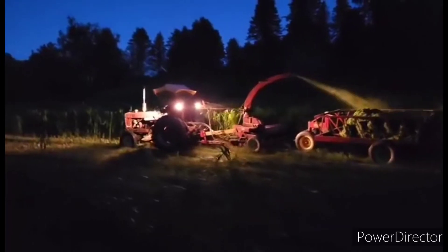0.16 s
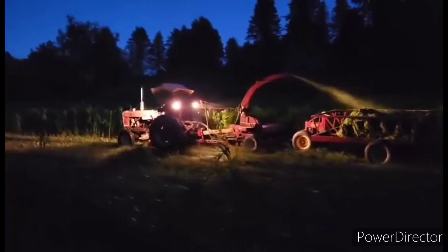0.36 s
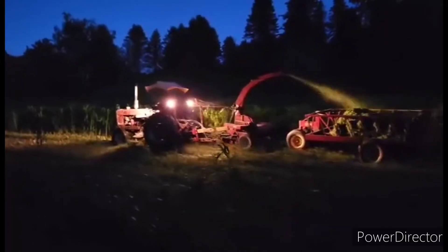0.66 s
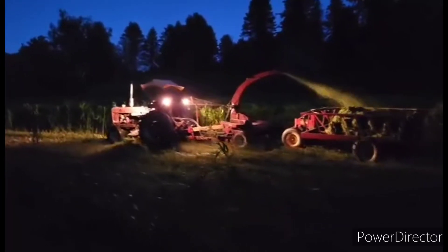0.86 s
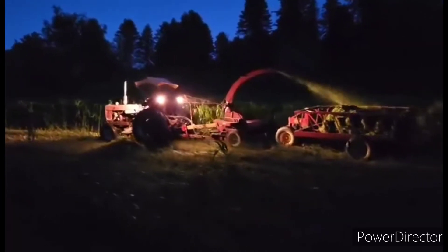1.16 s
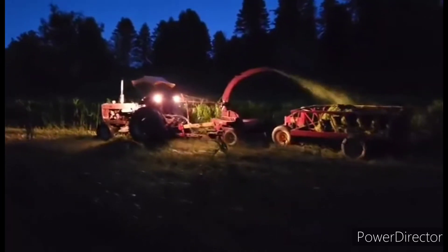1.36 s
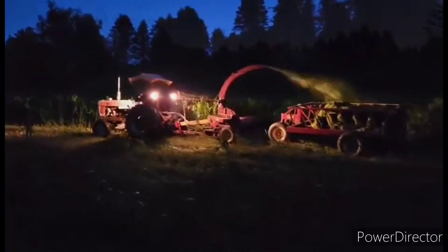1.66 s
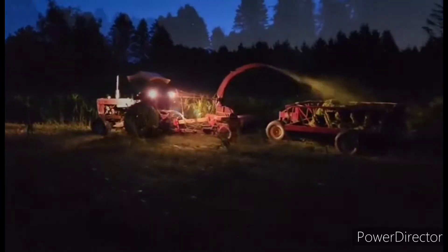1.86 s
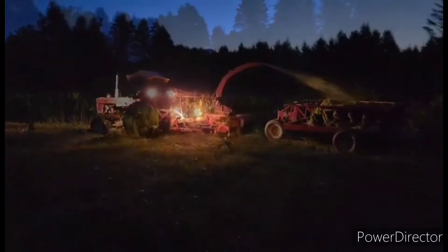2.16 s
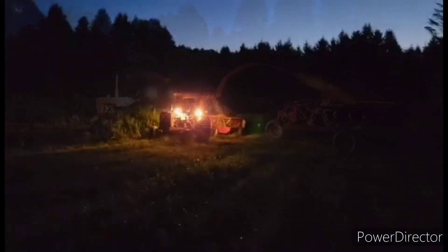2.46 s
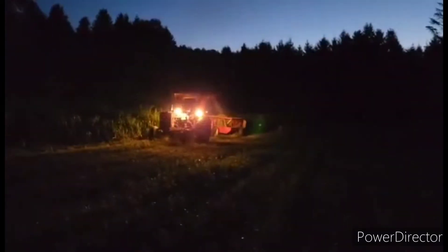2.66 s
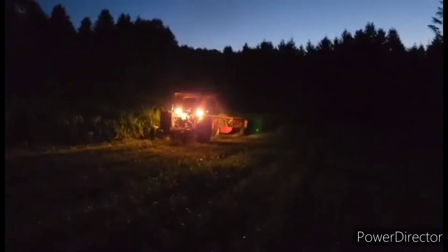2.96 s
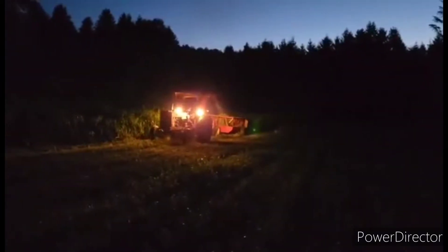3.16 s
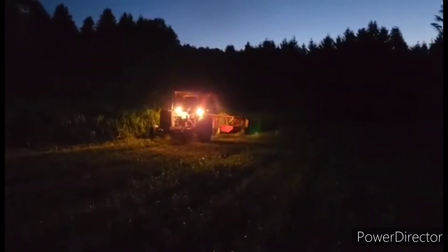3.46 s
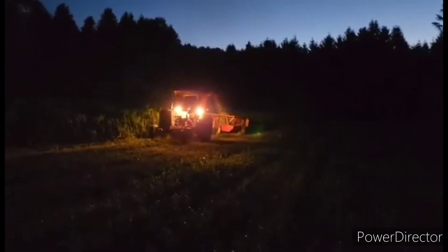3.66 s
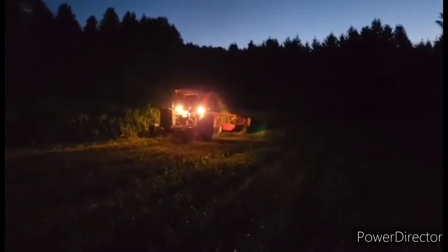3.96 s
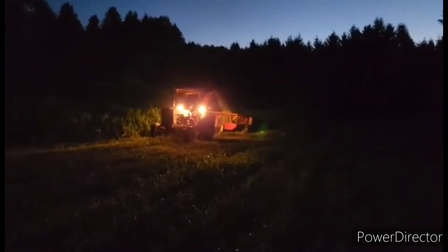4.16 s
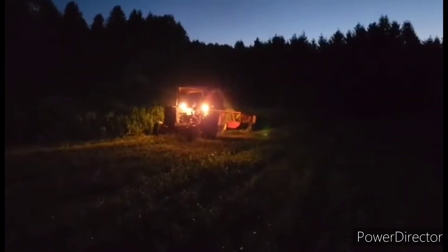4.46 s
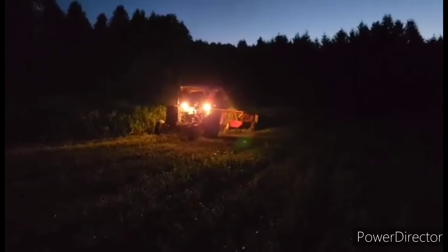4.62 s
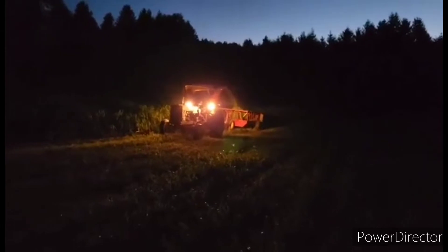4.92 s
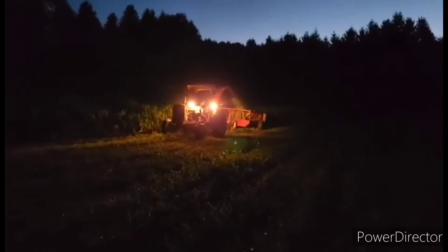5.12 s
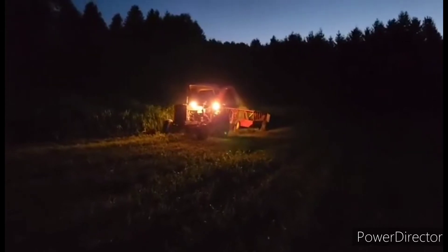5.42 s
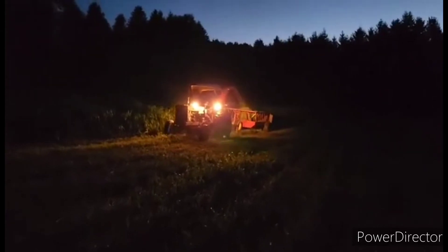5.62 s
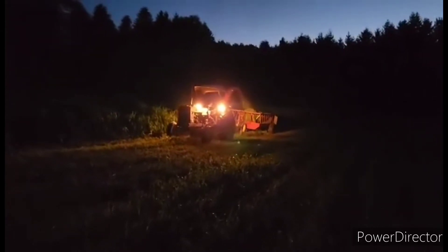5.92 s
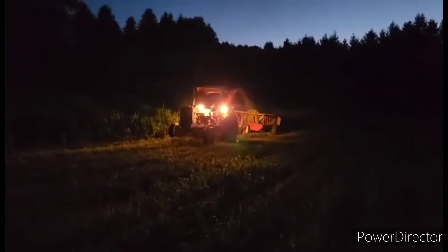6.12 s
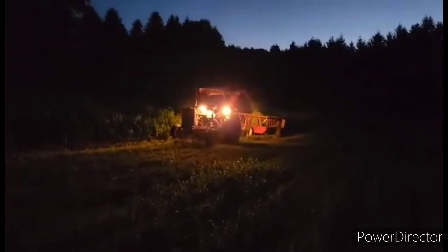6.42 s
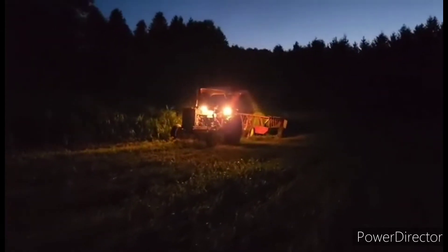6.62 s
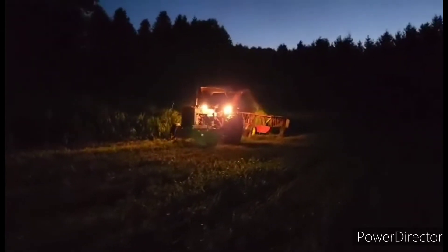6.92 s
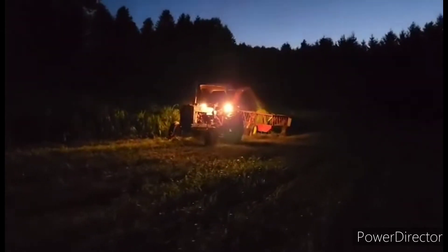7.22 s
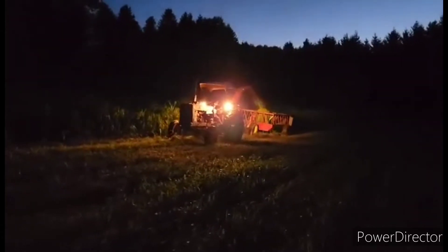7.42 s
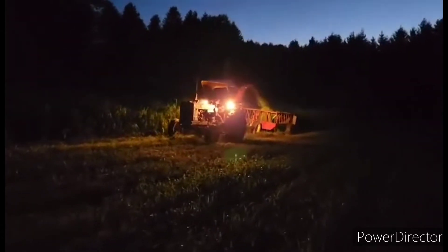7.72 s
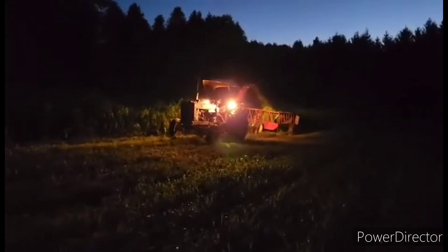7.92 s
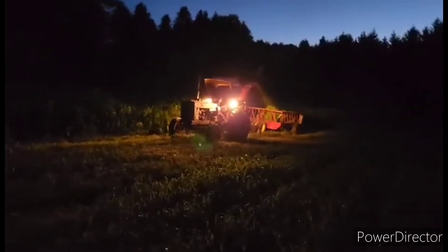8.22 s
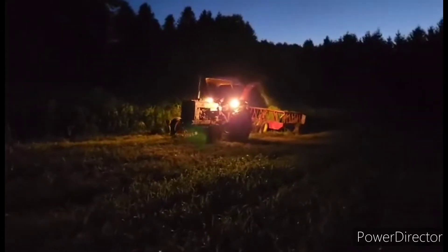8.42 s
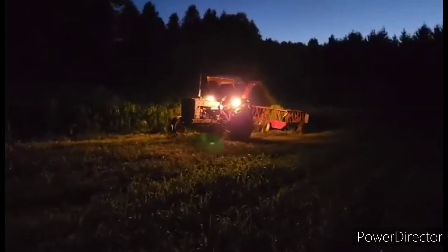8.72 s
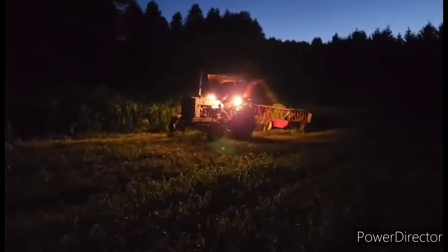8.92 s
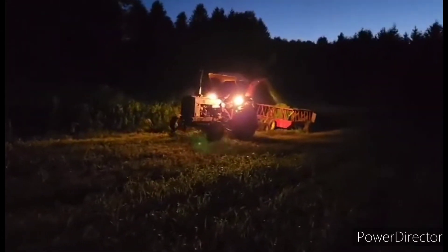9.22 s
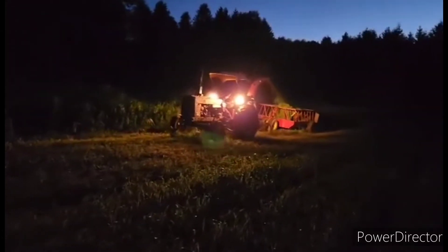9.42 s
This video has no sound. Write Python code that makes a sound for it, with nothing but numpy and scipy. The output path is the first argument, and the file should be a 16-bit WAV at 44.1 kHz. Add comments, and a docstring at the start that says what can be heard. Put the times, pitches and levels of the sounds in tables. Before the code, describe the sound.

Dense, unbroken machine roar outdoors: a strong low engine note, wavering gear whine, diesel knock and the hiss of chopped grass blown through a spout. Heard first from the side, leaning left in the treble; a tiny gap just after two seconds, then from the front with crisp spray and sparse stalk ticks. Near five seconds the top fades, leaving a darker steady roar to the end. Stereo pickup, no obvious echo.

```python
"""Tractor and flail chopper in tall grass

A six-cylinder tractor drives a flail chopper that cuts grass and blows it up a spout into a wagon.
Exhaust, flail rotor and blower drone as harmonics at geared speeds; shaped noise makes the rushing air
and diesel knock, and short decaying sines make the clatter and ticking stalks. Two microphone ports hear it
from the side, then, after a short silence, from ahead, where the tone soon changes and the bright spray fades."""
import sys
import numpy as np
from scipy import signal
from scipy.fft import rfft, irfft, next_fast_len
from scipy.io import wavfile
from scipy.ndimage import uniform_filter1d, map_coordinates

SR = 44100
rng = np.random.default_rng(int(sys.argv[2]) if len(sys.argv) > 2 else 0)


def to_wav(s):
    """Save 16-bit WAV."""
    ch = np.atleast_2d(s).T  # columns
    pcm = np.round(np.clip(ch, -1, 1) * 32767)  # PCM
    wavfile.write(sys.argv[1], SR, pcm.astype(np.int16))


N = 422478
TIME = np.arange(N) / SR
SIZE = next_fast_len(N + 8192, True)  # padded so that filter tails do not wrap round
HZ = np.fft.rfftfreq(SIZE, 1 / SR)
TOP_HZ = 13150  # upper band limit
SIDE_END, AHEAD_START = 2.137, 2.207  # s, silence between the two positions


def amp(db):
    """Decibels to gain."""
    return 10 ** (np.asarray(db) / 20)


def unit(x):
    """Scale to rms 1."""
    return x / np.sqrt(np.mean(x ** 2) + 1e-20)


def curve(rows):
    """(t/s, value) rows as one value per sample."""
    return np.interp(TIME, *np.transpose(rows))


def wobble(rate):
    """A smooth random curve, rate knots a second."""
    coarse = np.arange(0, TIME[-1] + .01, .002)
    knots = rng.standard_normal(2048)
    smooth = map_coordinates(knots, [coarse * rate], mode="wrap")
    return np.interp(TIME, coarse, smooth)


def filtered(x, response):
    """x times a response given on the HZ grid."""
    return irfft(rfft(x, SIZE) * response, SIZE)[..., :N]


def columns(rows):
    """Each column of a frequency table on the HZ grid, interpolated over log frequency."""
    hz, *cols = np.transpose(rows)
    return [np.interp(np.log(HZ + 1), np.log(hz), col) for col in cols]


# Firing rate of the governed engine, a little lower under load: [t/s, f/Hz]
FIRING = [(0.5, 111.98), (1.45, 111.66), (2.45, 113.65), (3.35, 113.68), (6.05, 113.3), (9.5, 113.35)]


def engine_firings():
    """Firings since the start, the integral of the firing rate: the clock of engine and driven shafts."""
    return np.cumsum(curve(FIRING)) / SR


# From ahead, crossfade from the first tone colour to the second: [t/s, share of the second 0-1]
TO_SECOND = [(4.66, 0), (4.73, .2), (4.8, .85), (4.92, 1)]


def drone(turns, table, flutter_db, slip, slip_rate):
    """Harmonics of one shaft waver in level; its slip (in turns) smears the high ones most."""
    out = np.zeros(N)
    stray = slip * wobble(slip_rate)
    second_share = curve(TO_SECOND)
    for multiple, side_db, *front_db in table:
        # a single front level serves both tone colours
        front = front_db[0] * (1 - second_share) + front_db[-1] * second_share
        level_db = np.where(TIME < AHEAD_START, side_db, front) + flutter_db * wobble(11)
        phase = round(multiple) * (turns + stray) + rng.random()
        out += np.sqrt(2) * amp(level_db) * np.sin(2 * np.pi * phase)
    return out


# Exhaust harmonics, before LOAD: [multiple of the engine cycle, side level/dB, first front level/dB,
# second front level/dB where it differs]
EXHAUST = [(2, -52, -48), (4, -47, -39), (5, -42, -50), (6, -17.8, -14.2), (12, -47, -35), (13, -50, -41.5),
           (14, -50, -43.5), (15, -52, -45), (19, -53, -51), (24, -53, -56, -50), (29, -56, -52, -45),
           (32, -46, -46), (35, -48, -44), (36, -40, -41), (37, -46, -45), (38, -44, -47), (39, -47, -44),
           (41, -52, -44), (42, -54, -45)]
# Gain of the exhaust note: [t/s, level/dB]
LOAD = [(.5, 2), (1.6, -0.5), (2.4, 0), (3.4, 1), (4.6, 0.3), (5.8, -0.5), (7.2, -0.1), (9.4, 0.8)]


def exhaust_note(cycle):
    """Six firings in each engine cycle make harmonics of the cycle, strongest at the firing rate."""
    return amp(curve(LOAD)) * drone(cycle, EXHAUST, flutter_db=.3, slip=.001, slip_rate=14)


# Flail rotor harmonics: [multiple of rotor speed, side level/dB, front level/dB]
FLAILS = [(1, -51, -51), (3, -34, -38), (4, -30.5, -31.5), (5, -33, -35), (6, -46, -40), (7, -45, -41),
          (8, -48, -42), (10, -48, -43)]


def flail_rotor(firings):
    """The geared rotor makes .233 turns for each firing and drones at multiples of its speed."""
    return drone(.233 * firings, FLAILS, flutter_db=0.2, slip=0.0049, slip_rate=5.7)


BLOWER_TURNS = .2432  # blower turns per firing
# Blower harmonics, before BLOWER_HUM: [multiple of blower speed, side level/dB, front level/dB]
BLOWER = [(2, -32, -43), (3, -41, -52), (4, -28, -38), (6, -34, -21.8), (10, -32.5, -46), (12, -36.5, -49),
          (14, -38.5, -55), (16, -47, -55), (18, -46, -52), (20, -54, -47)]
# Gain of the blower's hum as it swells and eases: [t/s, level/dB]
BLOWER_HUM = [(2.14, 0), (2.4, 2), (3.1, -.5), (4.1, -2), (5.2, .7), (7.9, 1.3), (9.5, -1.7)]


def blower_hum(firings):
    """The blower wheel hums at multiples of its geared speed."""
    hum = drone(BLOWER_TURNS * firings, BLOWER, flutter_db=0.55, slip=0.0048, slip_rate=5)
    return amp(curve(BLOWER_HUM)) * hum


# Gearbox mesh rate: [t/s, f/Hz]
MESH = [(2.14, 343.3), (2.2, 340.9), (9.5, 339.8)]
# Gearbox whine, before WHINE: [multiple of mesh rate, side level/dB, first front level/dB,
# second front level/dB where it differs]
GEARS = [(1, -48, -50), (2, -42, -44), (3, -36.0, -34.3, -35.5)]
# Gain of the whine: [t/s, level/dB]
WHINE = [(0, 1), (.3, 2.5), (.65, -3), (1.65, 2), (2.3, -.5), (4.6, -.5), (6.1, 2.2), (7, -.5), (8.7, 0),
         (9.5, -2)]
# Upper gearbox overtones, before OVERTONE_WHINE: [multiple of mesh rate, side level/dB,
# first front level/dB, second front level/dB]
GEAR_OVERTONES = [(4, -39.5, -47, -45.5), (5, -56, -52, -47), (6, -52, -43.5, -39.8), (7, -58, -57, -45.5)]
# Driveline tones that ring with them, before OVERTONE_WHINE: [multiple of the engine cycle,
# side level/dB, first front level/dB, second front level/dB]
GEAR_TRAIN = [(99, -60, -56, -49.5), (100, -60, -58, -51), (110, -60, -56, -51.5)]
# Gain of the overtones and driveline tones: [t/s, level/dB]
OVERTONE_WHINE = [(2.3, 7), (3.9, 2), (5.0, 4), (5.7, 4), (6.4, 6.5), (7.3, 2), (8.3, -4), (9.2, 4)]


def gearbox_whine(cycle):
    """Meshing teeth whine at multiples of the mesh rate, with ringing driveline tones above."""
    mesh = np.cumsum(curve(MESH)) / SR
    whine = drone(mesh, GEARS, flutter_db=2.0, slip=.015, slip_rate=16)
    overtones = drone(mesh, GEAR_OVERTONES, flutter_db=2.4, slip=.012, slip_rate=12)
    overtones += drone(cycle, GEAR_TRAIN, flutter_db=3, slip=.001, slip_rate=10)
    return whine * amp(curve(WHINE)) + overtones * amp(curve(OVERTONE_WHINE))


# Oil pump: [multiple of pump speed, side level/dB, first front level/dB, second front level/dB]
PUMP = [(1, -40.5, -45.5, -47)]


def oil_pump(firings):
    """The oil pump, geared up to 3.078 turns a firing, adds one unsteady tone."""
    return drone(3.078 * firings, PUMP, flutter_db=2.5, slip=0.056, slip_rate=6)


# Cooling fan: [multiple of fan tone, side level/dB, first front level/dB,
# second front level/dB where it differs]
FAN = [(1, -60, -38), (2, -43, -44), (6, -60, -56, -46)]


def cooling_fan(firings):
    """The fan's tones keep step with the engine at 2.774 cycles a firing and stray about it."""
    return drone(2.774 * firings, FAN, flutter_db=2.5, slip=0.031, slip_rate=6)


def driveline(firings):
    """All the rotating parts together, in step with the firings except for the gear mesh."""
    cycle = firings / 6
    return (exhaust_note(cycle) + flail_rotor(firings) + blower_hum(firings)
            + gearbox_whine(cycle) + oil_pump(firings) + cooling_fan(firings))


def bursts(firings, cylinder_db, lag, rise, decay, scatter_db):
    """An envelope that swells and dies at each firing, sized by its cylinder; times are shares of a firing."""
    late = firings + len(cylinder_db) - lag
    number, age = late.astype(int), late % 1
    size_db = cylinder_db[number % len(cylinder_db)] + scatter_db * rng.standard_normal(2048)[number]
    swell = np.sin(np.pi / 2 * np.minimum(age / rise, 1))
    return unit(amp(size_db) * (.4 + .6 * swell) * np.exp(-age / decay))


# Relative strength of each cylinder in firing order: [knock level/dB, exhaust bark level/dB]
CYLINDERS = [(-2, -3), (0, 1), (0, 2), (3, 2), (-2, -5), (5.5, 2)]


def cylinder_pulses(firings):
    """Knock and bark envelopes: the uneven cylinders repeat their pattern every six firings."""
    knock_db, bark_db = np.transpose(CYLINDERS)
    knock = bursts(firings, knock_db, lag=.2, rise=.22, decay=.55, scatter_db=.9)
    bark = bursts(firings, bark_db, lag=.1, rise=.28, decay=.85, scatter_db=.5)
    return knock, bark


def gated_noise(envelope, share):
    """Noise for two channels; the given share of its power follows the envelope."""
    return rng.standard_normal((2, N)) * np.sqrt(1 - share + share * envelope ** 2)


# Thick and thin patches of grass, before air and spray scale them: [middle t/s, length/s, level/dB]
PATCHES = [(1.36, 0.22, 4.6), (2.05, 0.45, -0.5), (4.204, 0.1, 0.5), (6.25, .3, 0), (7.3, .6, -0.8),
           (8.0, .25, -0.5), (8.5, 0.54, 0), (9.298, .25, 0.5)]
FEED_UNEVEN_DB, FEED_RATE = -0.08, 3.1  # chance unevenness: depth in dB, knots a second


def crop_feed():
    """Crop feed in dB: each patch swells or dips smoothly over a slightly uneven flow."""
    feed_db = FEED_UNEVEN_DB * wobble(FEED_RATE)
    for middle, length, db in PATCHES:
        position = np.clip((TIME - middle) / length, -.5, .5)
        feed_db = feed_db + db * np.cos(np.pi * position) ** 2
    return feed_db


def stalks(per_second, spread_db, life, top_hz):
    """Chopped stalks tick against steel, each a decaying sine (life in s) with its own pitch."""
    when, pitch, size, phase = rng.random((int(per_second * N / SR), 4)).T[:, :, None]
    k = np.arange(256)
    ticks = np.sin(2 * np.pi * (pitch * top_hz * k / SR + phase)) * np.exp(-k / (life * SR))
    ticks *= amp(spread_db * np.minimum(-np.log(size), 4))
    places = (when * N).astype(int) + k
    return unit(np.bincount(places.ravel(), ticks.ravel(), N)[:N])


def crop_spray(knock, feed_db, knock_share, spray_db):
    """Grainy treble: partly knock-gated noise and dense stalk ticks, swelling with the crop."""
    ticks = np.array([stalks(per_second=1000, spread_db=3.0, life=.0014, top_hz=TOP_HZ)
                      for channel in range(2)])
    grains = .9 * gated_noise(knock, knock_share) + .46 * ticks
    return grains * amp(spray_db + 1.4 * feed_db)


# Tough stalks striking the spout: [t/s, level/dB, f/Hz]
HARD_STALKS = [(2.4016, -17, 6590), (3.122, -21, 6540), (4.4075, -13.5, 4960), (4.6729, -20, 4100),
               (5.8892, -21, 4310), (6.2603, -19, 4460), (7.7415, -22, 3580), (8.166, -21, 4020),
               (8.2713, -19, 4640)]
STALK_LIFE_S, STALK_CRACK = .0014, .28  # decay time, noise added to the sine


def hard_stalks():
    """Now and then a tough stalk hits the spout with one short, bright tick."""
    out = np.zeros(N)
    t = np.arange(SR // 100) / SR
    for start, db, hz in HARD_STALKS:
        tick = np.sin(2 * np.pi * hz * t) + STALK_CRACK * rng.standard_normal(len(t))
        out[round(start * SR):][:len(t)] += amp(db) * tick * np.exp(-t / STALK_LIFE_S)
    return out


# Gain of the air stream: [t/s, level/dB]
AIR_FLOW = [(.3, 0.5), (.7, 0), (1.3, -0.9), (1.9, -0.7), (2.25, -1), (4.3, -1.2), (4.9, -1.5), (5.5, -1.5),
            (6.3, -0.9), (7.0, -1.5), (9.5, -2)]


def air_stream(firings, knock, feed_db, air_db, clatter_db):
    """Rushing air with a little diesel knock and flail clatter, pulsing with the blower."""
    clatter = np.array([stalks(per_second=260, spread_db=2.5, life=.0016, top_hz=3500)
                        for channel in range(2)])
    # the blower flings a wad of crop once a turn
    wad_db = .8 * np.cos(2 * np.pi * BLOWER_TURNS * firings)
    rush = gated_noise(knock, share=.11) + amp(clatter_db) * clatter
    return rush * amp(air_db + curve(AIR_FLOW) + .15 * feed_db + wad_db)


def patchy(x, depth_db):
    """Spectrum of x with brief patches of random gain, each a few hundred Hz wide."""
    z = signal.stft(x, nperseg=256)[2]
    field = uniform_filter1d(rng.standard_normal(z.shape[1:]), size=4, axis=0)
    field = unit(uniform_filter1d(field, size=24, axis=1))
    patched = signal.istft(z * amp(depth_db * field), nperseg=256)[1]
    return rfft(patched[:, :N], SIZE)


def panel_modes(spacing_hz, depth_db):
    """The sheet-steel housing has many close modes that ripple the upper spectrum."""
    ripple = map_coordinates(rng.standard_normal(2048), [HZ / spacing_hz], order=1, mode="wrap")
    return amp(depth_db * ripple * HZ ** 2 / (HZ ** 2 + 1500 ** 2))


def machine_noise(firings, knock, bark, feed_db, knock_share, pipe_db, air_db, spray_db, clatter_db):
    """Exhaust bark owns the lows, the air stream the middle, knock and stalks the top; two spectra."""
    pipe = gated_noise(bark, share=.8) * amp(pipe_db)
    air = air_stream(firings, knock, feed_db, air_db, clatter_db)
    spray = crop_spray(knock, feed_db, knock_share, spray_db)
    # power crossovers at 900 Hz and 3500 Hz
    low = 1 / (1 + (HZ / 900) ** 4)
    top = HZ ** 4 / (HZ ** 4 + 3500 ** 4)
    upper = patchy(air, depth_db=0.88) * np.sqrt(1 - top) + patchy(spray, depth_db=1.5) * np.sqrt(top)
    upper *= panel_modes(spacing_hz=45, depth_db=1.3)
    return rfft(pipe, SIZE) * np.sqrt(low) + upper * np.sqrt(1 - low)


# Noise at the two microphone ports, before the source gains, from the side and in three tone colours
# from ahead (the second and third share one roar); roar below about 800 Hz, hiss above:
# [f/Hz, left level/dB per Hz, right level/dB per Hz, likeness of the ports 0-1, left lead/rad]
SIDE_ROAR = [(25, -60.0, -60.0, 1.0, 0.0), (38, -60.0, -60.0, 1, 0.0), (58, -49.5, -49.5, 1.0, 0.0),
             (110, -46.0, -46.0, 1, 0.0), (240, -52.5, -52.5, 0.97, 0.1), (340, -53.5, -53.0, 0.97, 0.6),
             (390, -56.0, -54.5, 0.94, 1.1), (460, -57.5, -63.5, 0.81, 1.4), (560, -51.5, -57.0, 0.95, 0.6),
             (690, -46.0, -48.0, 0.99, 0.9), (790, -54.5, -54.5, 0.85, 1.4)]
SIDE_HISS = [(880, -55.0, -57.0, 0.73, 2.3), (1070, -50.5, -58.0, 0.82, 1.6),
             (1200, -52.5, -57.5, 0.81, 2.1), (1450, -50.0, -59.0, 0.51, 2.2),
             (1650, -50.5, -53.5, 0.78, 2.5), (1800, -54.0, -56.5, 0.71, 3.5),
             (1980, -53.5, -65.0, 0.32, 5.3), (2250, -54.0, -61.0, 0.56, 9.0),
             (2550, -56.5, -68.5, 0.25, 9.6), (2800, -56.5, -68.0, 0.53, 9.6),
             (3050, -55.5, -68.0, 0.52, 10.5), (3680, -58.5, -74.0, 0.19, 13.6),
             (3850, -66.0, -83.5, 0.1, 13.6), (4200, -64.0, -81.0, 0.1, 13.6),
             (4900, -73.0, -89.0, 0.1, 13.6), (5300, -70.5, -87.0, 0.1, 13.6),
             (5800, -78.5, -95.5, 0.1, 13.6), (6100, -76.0, -90.5, 0.1, 13.6),
             (6700, -81.5, -99.0, 0.1, 13.6), (7500, -78.5, -95.5, 0.1, 13.6),
             (8600, -84.5, -101.0, 0.1, 13.6), (9500, -83.0, -98.0, 0.1, 13.6),
             (12000, -90.5, -106.0, 0.1, 13.6)]
FIRST_ROAR = [(25, -60.5, -60.5, 1.0, 0.0), (38, -60.0, -60.0, 1, 0.0), (58, -50.5, -50.5, 1.0, 0.0),
              (110, -47.0, -47.0, 1.0, 0.0), (240, -48.9, -49.2, 1.0, 0.0), (340, -56.0, -54.5, 0.96, 0.5),
              (390, -63.5, -62.0, 0.78, 0.6), (470, -65.5, -70.0, 0.84, 0.5),
              (560, -54.0, -59.0, 0.95, 0.3), (690, -47.7, -48.3, 0.98, 0.5),
              (790, -52.5, -48.5, 0.93, 0.9)]
FIRST_HISS = [(850, -57.5, -51.5, 0.75, 1.5), (920, -60, -60.5, 0.88, 2.6), (1070, -56.5, -61.0, 0.78, 1.7),
              (1220, -57.0, -60.0, 0.75, 2.4), (1400, -53.0, -59.5, 0.74, 2.0),
              (1550, -54.0, -55.0, 0.8, 2.5), (1660, -58.5, -58.5, 0.97, 3.2),
              (1850, -57.5, -64.5, 0.46, 5.4), (2060, -55.5, -59.5, 0.62, 8.8),
              (2190, -59.0, -61.5, 0.88, 9.4), (2450, -60.0, -64.5, 0.54, 12.9),
              (2750, -61.0, -64.0, 0.67, 15.6), (3100, -59.0, -66.5, 0.34, 20.7),
              (3350, -59.5, -63.5, 0.52, 23.0), (3550, -61.5, -63.5, 0.53, 24.8),
              (3850, -63.5, -70.0, 0.13, 25.9), (4200, -64.0, -65.5, 0.6, 27.6),
              (4480, -64.5, -64.5, 0.96, 28.3), (4800, -63.0, -63.0, 0.74, 28.2),
              (5250, -64.5, -64.5, 0.33, 31.0), (5550, -66.0, -66.0, 0.25, 34.8),
              (5800, -65.5, -65.5, 0.48, 37.8), (6000, -65.5, -65.5, 0.19, 41.1),
              (6250, -64.0, -64.0, 0.04, 42.2), (6550, -62.5, -64.5, 0.43, 43.6),
              (7150, -64.0, -66.0, 0.38, 44.5), (7600, -65.5, -71.0, 0.1, 44.5),
              (8600, -73.5, -78.0, 0.1, 44.5), (9800, -78.5, -74.5, 0.1, 44.5),
              (12500, -84.5, -84.5, 0.1, 44.5)]
LATER_ROAR = [(25, -63.5, -63.5, 1.0, 0.0), (38, -59.0, -59.0, 1, 0.0), (58, -50.5, -50.5, 1.0, 0.0),
              (110, -46.3, -46.3, 1.0, 0.0), (240, -48.9, -48.9, 1.0, 0.0), (340, -57.0, -57.0, 0.96, 0.5),
              (390, -60.5, -62.0, 0.78, 0.6), (460, -59.0, -62.0, 0.84, 0.5),
              (560, -55.0, -56.5, 0.95, 0.3), (690, -47.5, -47.7, 0.98, 0.5),
              (790, -55.5, -54.0, 0.93, 0.9)]
SECOND_HISS = [(880, -56.5, -61.0, 0.7, 1.4), (1070, -57.5, -60.0, 0.77, 1.1),
               (1200, -57.5, -61.0, 0.68, 1.2), (1450, -52.0, -55.5, 0.88, 1.2),
               (1680, -59.0, -62.5, 0.54, 0.5), (1900, -56.0, -55.5, 0.82, 1.4),
               (2100, -56.0, -55.5, 0.81, 1.4), (2500, -57.0, -57.0, 0.74, 2.4),
               (2800, -59.5, -59.0, 0.96, 3.1), (3000, -58.5, -58.0, 0.92, 3.1),
               (3250, -58.0, -57.0, 0.92, 3.2), (3600, -61.5, -59.0, 0.54, 3.9),
               (4100, -62.5, -62.5, 0.61, 5.7), (4600, -65.5, -68.5, 0.64, 6.3),
               (5300, -68.5, -83.5, 0.1, 6.3), (6300, -67.0, -84.0, 0.1, 6.3),
               (7800, -75.0, -91.5, 0.1, 6.3), (8700, -78.5, -93.5, 0.1, 6.3),
               (9400, -78.5, -92.5, 0.1, 6.3), (12500, -83.5, -101.5, 0.1, 6.3)]
THIRD_HISS = [(880, -57.5, -60.0, 0.69, 1.2), (1070, -54.0, -57.5, 0.88, 0.7),
              (1200, -55.0, -59.5, 0.83, 0.7), (1450, -52.0, -55.0, 0.88, 1.1),
              (1680, -57.5, -58.0, 0.84, 0.1), (1900, -55.5, -55.0, 0.85, 0.8),
              (2100, -55.5, -53.5, 0.73, 1.1), (2500, -57.5, -55.5, 0.7, 1.7),
              (2850, -58.5, -58.0, 0.72, 2.7), (3150, -59.5, -56.0, 0.64, 2.8),
              (3500, -59.5, -55.5, 0.62, 3.2), (4100, -62.5, -60.0, 0.47, 5.2),
              (4600, -65.0, -65.5, 0.79, 6.2), (5200, -67.0, -79.0, 0.1, 6.2),
              (6200, -67.5, -84.0, 0.1, 6.2), (7800, -76.5, -93.5, 0.1, 6.2),
              (8700, -79.5, -95.0, 0.1, 6.2), (9400, -77.5, -91.5, 0.1, 6.2),
              (10600, -81.0, -94.0, 0.1, 6.2), (12500, -79.5, -96.5, 0.1, 6.2)]


def vantage(tones, noise, roar, hiss):
    """The rig at both ports: direct sound reaches the two alike, scattered sound differs between them."""
    left_db, right_db, alike, lead = columns(list(roar) + list(hiss))
    common, apart = noise
    # mixing angle that gives the ports the wanted likeness
    turn = np.arccos(np.clip(alike, 0, 1)) / 2
    sign = np.array([[1], [-1]])
    ports = amp([left_db, right_db])
    rush = ports * np.sqrt(SR / 2) * (np.cos(turn) * common + sign * np.sin(turn) * apart)
    # the tones take only the balance between the ports
    lines = tones * ports / np.sqrt(np.mean(ports ** 2, axis=0))
    return irfft((rush + lines) * np.exp(.5j * sign * lead), SIZE)[:, :N]


# Delay of the right port in the first front tone: [t/s, delay/s]
PORT_DELAY = [(2.2, -.000016), (4.8, .000022)]


def drifting(pair):
    """A growing delay makes the right port slowly fall behind the left."""
    late = (TIME - curve(PORT_DELAY)) * SR
    return np.array([pair[0], map_coordinates(pair[1], [late], mode="mirror")])


# Crossfade from the second front tone to the third: [t/s, share of the third 0-1]
TO_THIRD = [(5.35, 0), (5.85, .55), (6.4, .45), (6.85, 1)]
# Bright spray of the first front tone, fading from the right port first: [t/s, share left over 0-1]
SPRAY_LEFT = [(4.7, 1), (4.82, .45), (5.0, .1), (5.2, 0)]
SPRAY_RIGHT = [(3.8, 1), (4.3, .6), (4.6, .3), (4.85, 0)]


def front_tones(first, second, third):
    """Crossfades between three front tone colours; the bright spray fades port by port."""
    second_share, third_share = curve(TO_SECOND), curve(TO_THIRD)
    later = (1 - third_share) * second + third_share * third
    # the shared drone largely cancels in this difference and so carries straight on
    difference = first - later
    treble = filtered(difference, HZ ** 16 / (HZ ** 16 + 5200. ** 16))
    spray = np.array([curve(SPRAY_LEFT), curve(SPRAY_RIGHT)])
    return later + (difference - treble) * (1 - second_share) + treble * spray


def scene():
    """Side position, a short silence, then the position ahead in three successive tone colours."""
    firings = engine_firings()
    tones = rfft(driveline(firings), SIZE)
    knock, bark = cylinder_pulses(firings)
    feed_db = crop_feed()
    flank = machine_noise(firings, knock, bark, feed_db, knock_share=0.15, pipe_db=0.14,
                          air_db=-1.65, spray_db=-1.8, clatter_db=-14)
    nose = machine_noise(firings, knock, bark, feed_db, knock_share=0.4, pipe_db=0.4,
                         air_db=-0.6, spray_db=-0.1, clatter_db=-15)
    side = vantage(tones, flank, SIDE_ROAR, SIDE_HISS)
    first = drifting(vantage(tones, nose, FIRST_ROAR, FIRST_HISS))
    second = vantage(tones, nose, LATER_ROAR, SECOND_HISS)
    third = vantage(tones, nose, LATER_ROAR, THIRD_HISS)
    front = front_tones(first, second, third) + hard_stalks()
    return side * (TIME < SIDE_END) + front * (TIME > AHEAD_START)


def record(dry):
    """The microphone drops the deepest rumble, below about 9 Hz, and everything above its band limit."""
    return filtered(dry, (HZ < TOP_HZ) * HZ ** 2 / (HZ ** 2 + 9 ** 2))


dry = scene()
out = record(dry)
to_wav(out)
```